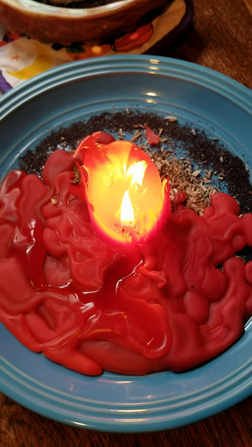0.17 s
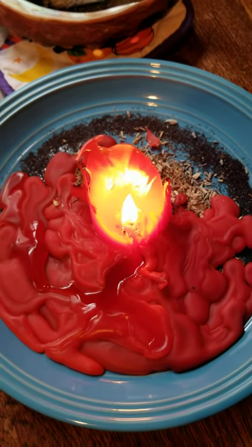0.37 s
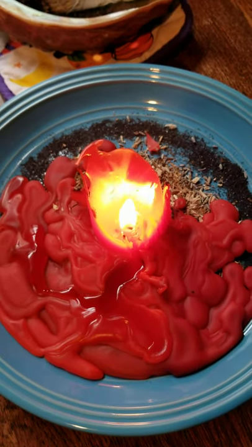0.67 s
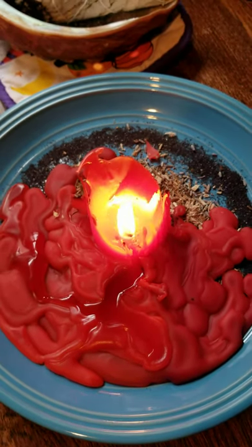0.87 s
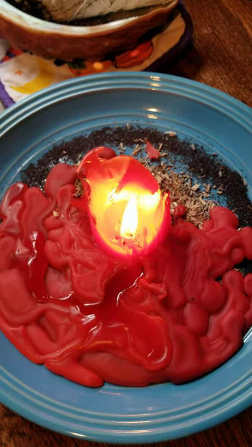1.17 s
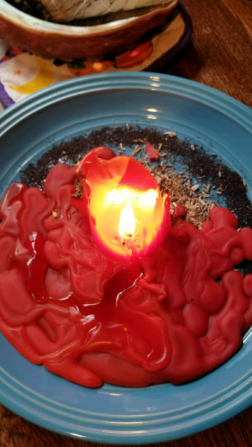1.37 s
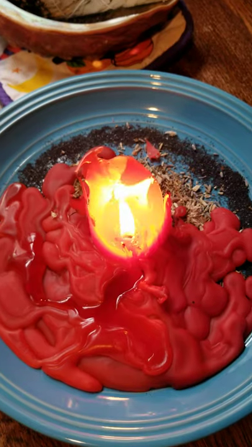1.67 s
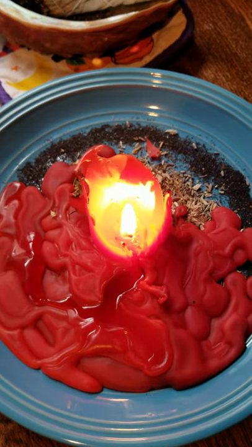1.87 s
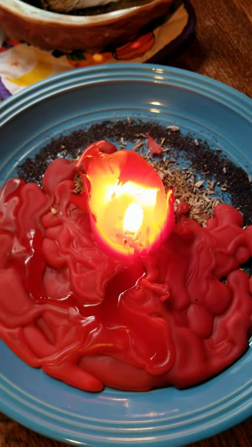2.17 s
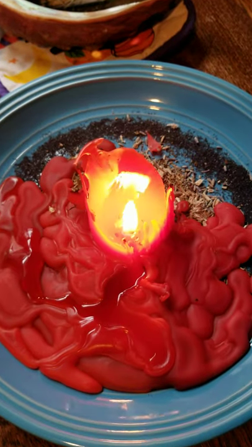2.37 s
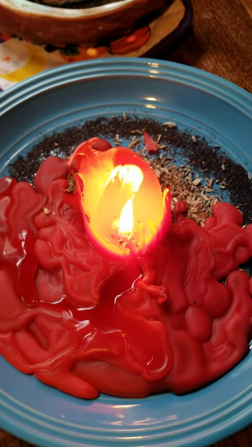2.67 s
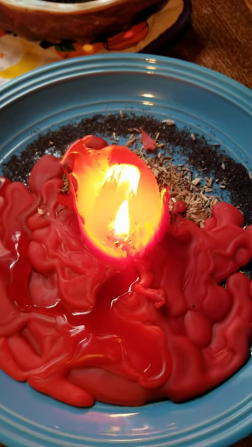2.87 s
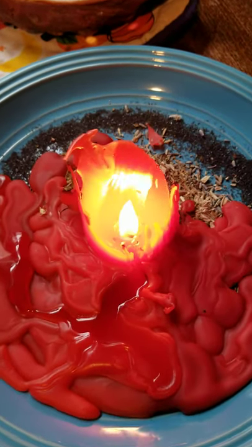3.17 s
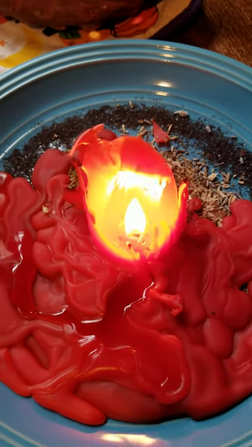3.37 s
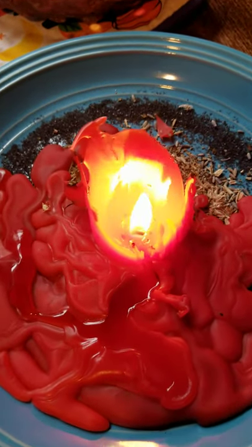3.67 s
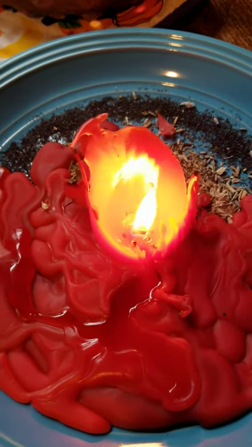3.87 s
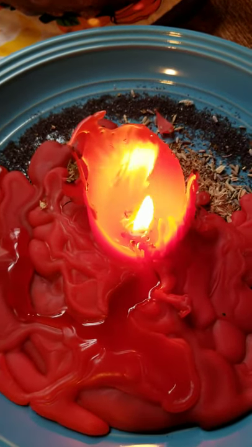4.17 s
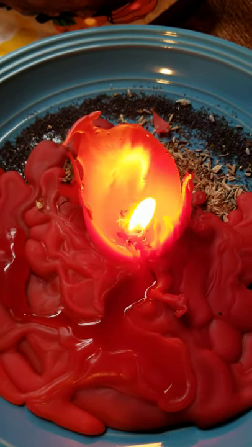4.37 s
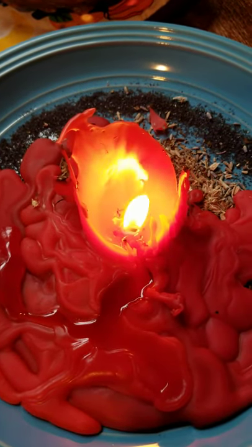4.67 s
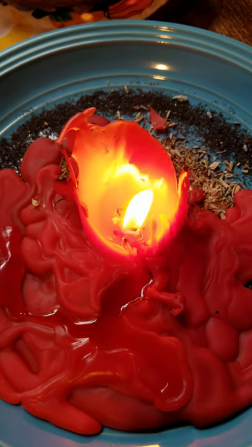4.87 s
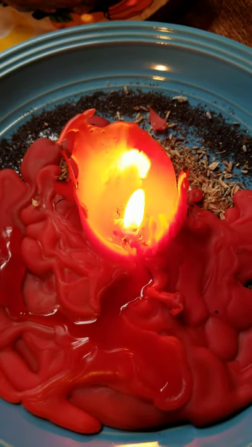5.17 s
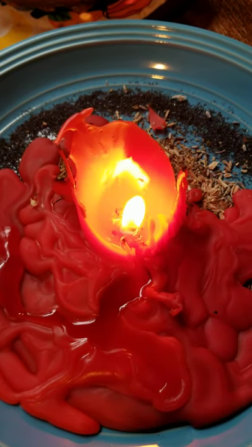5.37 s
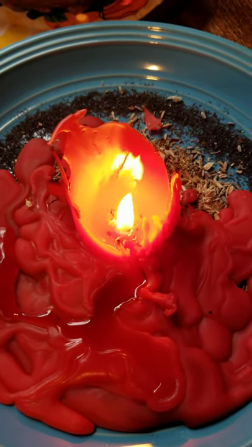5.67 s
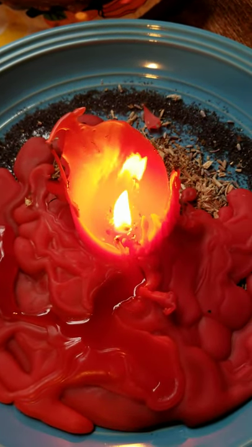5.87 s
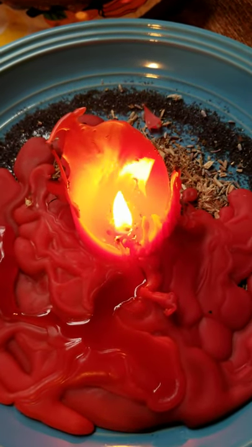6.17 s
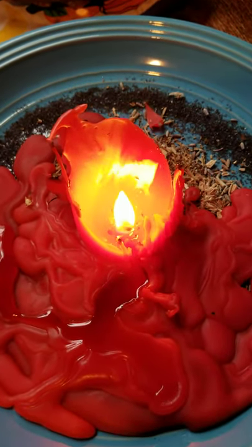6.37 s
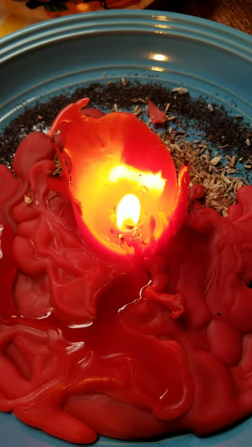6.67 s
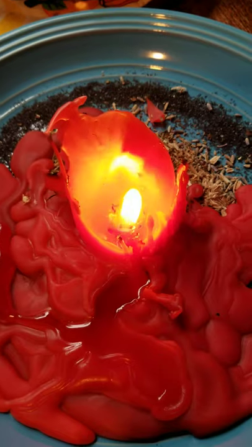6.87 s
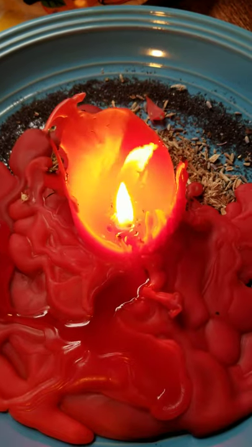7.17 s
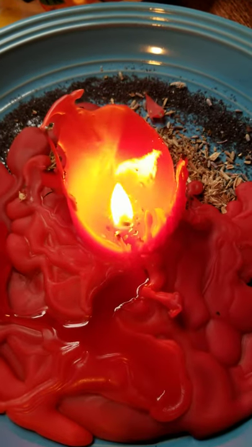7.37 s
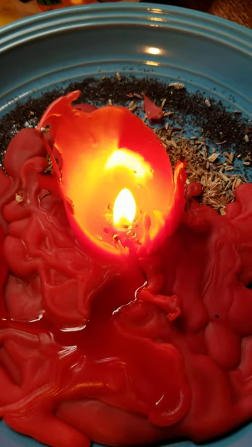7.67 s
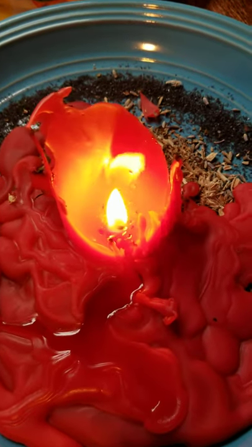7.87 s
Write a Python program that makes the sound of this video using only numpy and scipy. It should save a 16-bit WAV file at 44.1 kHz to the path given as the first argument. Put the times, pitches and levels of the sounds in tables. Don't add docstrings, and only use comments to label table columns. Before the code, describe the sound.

A candle stub burns in melted wax on a plate, heard very close in stereo in a small quiet room. Faint low hum and hiss come first, then isolated bright snaps with long gaps. Near the middle a rapid volley of loud pops opens a dense, fluttering sizzle full of spits. It dies into a crackling lull, then a softer second sizzle rises and continues to the end.

```python
import sys
import numpy as np
from scipy import signal
from scipy.fft import rfft, irfft, next_fast_len
from scipy.io import wavfile
from scipy.ndimage import map_coordinates

SR = 44100
rng = np.random.default_rng(int(sys.argv[2]) if len(sys.argv) > 2 else 0)


def elevation(decibels):
    levels = np.asarray(decibels, float)
    return 10 ** (levels / 20)


def waveform_to_disk(signal):
    frames = np.transpose(np.atleast_2d(signal))
    scaled = np.clip(frames, -1, 1) * 32767
    samples = np.round(scaled).astype(np.int16)
    wavfile.write(sys.argv[1], SR, samples)


N = 353241


def unit(x):
    return x / np.sqrt(np.mean(x ** 2, axis=-1, keepdims=True) + 1e-20)


def along(points, hz):
    point_hz, value = np.transpose(points)
    return np.interp(np.log(hz + 1), np.log(point_hz + 1), value)


def curves(rows, silent=None):
    s, *columns = np.transpose(rows)
    return [np.interp(np.arange(N) / SR, s, column, left=silent) for column in columns]


def wobble(rate):
    knots = rng.standard_normal(int(N * rate / SR) + 4)
    return map_coordinates(knots, [np.arange(N) * rate / SR])


def filtered(x, response):
    m = 2 * next_fast_len(N // 2 + SR // 4)
    return irfft(rfft(x, m) * response(np.fft.rfftfreq(m, 1 / SR)), m)[..., :N]


def causal(points):
    def response(hz):
        cepstrum = irfft(np.log(elevation(along(points, hz))))
        cepstrum[1:len(hz) - 1] *= 2
        cepstrum[len(hz):] = 0
        return np.exp(rfft(cepstrum))
    return response


def band(x, lo_hz, hi_hz):
    return signal.sosfilt(signal.butter(2, [lo_hz, hi_hz], "band", fs=SR, output="sos"), x)


# (time [s], peak level [dB], flame puff re peak [dB], cup ring re peak [dB])
LONE_POPS = [(0.7622, -39, -30, -2), (0.7645, -33.5, -20, -12), (0.7713, -20.5, -33, -1.5),
             (0.7729, -27, -41, -20), (0.7911, -26.5, -33, -10), (0.891, -40, -36, -21),
             (0.9151, -28, -54, -10.5), (0.935, -38, -46, -8), (0.992, -45, -26, 1.5),
             (1.0084, -39, -25, -3), (1.0132, -35, -36, -4), (1.039, -20.5, -44, -13.5),
             (1.2413, -26, -35, -10), (1.4612, -37.5, -29, -8), (1.508, -47, -26, -7),
             (1.5252, -44, -37, -16), (1.5453, -38, -36, -15), (1.5695, -46, -33, -6),
             (1.668, -49, -38, -9), (2.1653, -28.5, -18.5, -5), (2.262, -48, -12, -23),
             (2.32, -48.5, -20, -5), (2.783, -52.5, -15, -2), (3.4885, -33, -24, -9),
             (3.491, -21.5, -29, -25), (3.4939, -20, -28.5, -10), (3.4981, -27, -42, -13),
             (3.6335, -25, -31, -10.5), (3.663, -42, -26, -3.5), (3.719, -45, -23, -9)]
OPENING_VOLLEY = [(3.8127, -17.5, -18, -10.5), (3.8183, -30, -13.5, 2.5), (3.8318, -26, -18, -20),
                  (3.8733, -37, -15, -17), (3.8892, -18, -27, -14), (3.9174, -39, -22, -8),
                  (3.9209, -18, -29, -13), (3.926, -17.5, -31, -12), (3.9268, -14.5, -31, -7),
                  (3.9366, -10, -31.5, -18), (3.952, -12.5, -27, -25), (3.9668, -16.5, -26, -8),
                  (3.9786, -19.5, -18, -14), (4.021, -18.5, -23, -6.5), (4.0435, -44, -23, -7),
                  (4.0536, -18, -26.5, -12), (4.0848, -13.5, -27, -10)]


def pops(spray_db, spray_s, echo_db):
    t = np.arange(512) / SR
    snap, ring, puff = np.zeros((3, N + len(t)))
    for s, db, puff_db, ring_db in np.vstack([LONE_POPS, OPENING_VOLLEY, spits()]):
        spray = elevation(spray_db + rng.normal(0, 1.36) - 60 * t / spray_s)
        burst = spray * rng.standard_normal(len(t))
        burst[0] = 1
        echo_at = rng.integers(50, 75)
        burst[echo_at] += elevation(echo_db + rng.normal(0, 3)) * rng.choice([-1, 1])
        start = round(s * SR)
        at = slice(start, start + len(t))
        snap[at] += elevation(db + 21.0) * burst
        ring[at] += elevation(db + ring_db + 27.5) * burst
        puff[at] += elevation(db + puff_db + 46) * burst
    return band(snap[:N], 3380, 19845) + band(ring[:N], 2015, 4380) + band(puff[:N], 202, 770)


# (time [s], level [dB])
BOIL_LEVEL = [(4.075, -76), (4.1, -38), (4.36, -41), (4.4, -42), (4.8, -43.5), (4.85, -39.5), (4.97, -38),
              (5.08, -44), (5.16, -39.5), (5.295, -40), (5.325, -58.5), (5.52, -42.5), (5.66, -61.5),
              (6.15, -62.5), (6.95, -48.5), (7.06, -41.5), (7.25, -47), (8.01, -47.5)]
# (time [s], peak level [dB], flame puff re peak [dB])
FIRST_BOIL_SPITS = [(4.128, -23, -32), (4.1642, -23, -29), (4.18, -17.5, -28.5), (4.2289, -20, -34),
                    (4.2759, -23, -33), (4.3514, -14.5, -46), (4.3919, -24.5, -37), (4.489, -20.5, -21),
                    (4.5607, -21, -29), (4.6094, -22.5, -25), (4.7132, -21, -23), (4.7499, -19, -24.5),
                    (4.7855, -26.5, -23), (4.8307, -19, -25), (4.9474, -19.5, -18.5),
                    (5.1202, -18.5, -26.5), (5.1536, -18.5, -20), (5.1862, -24, -34), (5.233, -18.5, -31),
                    (5.2934, -19.5, -27), (5.3374, -23, -33.5), (5.419, -22, -20.5), (5.462, -21, -19),
                    (5.4821, -20, -25), (5.5171, -23, -21.5), (5.57, -24, -20), (5.6267, -29.5, -24),
                    (5.7087, -34, -39), (5.7182, -36, -39), (5.735, -29.5, -46)]
LULL_SPITS = [(5.9298, -34, -35), (5.9356, -26.5, -37), (5.9433, -26, -27), (6.104, -24, -34.5),
              (6.124, -50, -32), (6.1548, -30.5, -34), (6.1602, -23, -42), (6.1824, -21.5, -27),
              (6.2113, -37, -28), (6.2248, -30.5, -30), (6.2838, -36, -28), (6.2999, -32.5, -32),
              (6.325, -40.5, -32), (6.402, -34.5, -18), (6.4149, -29, -18.5), (6.4717, -32.5, -25),
              (6.4867, -37, -35), (6.5236, -30, -29), (6.546, -31, -32), (6.5652, -30.5, -29),
              (6.5987, -26.5, -28), (6.6123, -31, -34), (6.6189, -28.5, -36), (6.629, -32.5, -18.5),
              (6.6496, -26.5, -30), (6.6818, -24, -33), (6.7084, -27, -28), (6.7176, -19.5, -32),
              (6.7753, -27, -29)]
SECOND_BOIL_SPITS = [(6.8288, -21, -24), (6.9106, -24.5, -19.5), (6.9664, -27.5, -21), (7.0267, -26.5, -20),
                     (7.0452, -25, -15.5), (7.0738, -24, -20.5), (7.0953, -28, -28), (7.1204, -21, -21),
                     (7.1879, -23, -17.5), (7.1956, -29, -16), (7.259, -30, -14.5), (7.323, -25.5, -24),
                     (7.3297, -22.5, -20), (7.4082, -25, -18.5), (7.4113, -25, -20.5), (7.5003, -33, -12.5),
                     (7.5499, -27, -22), (7.6137, -30.5, -19.5), (7.6495, -26, -22), (7.6803, -29, -19),
                     (7.7245, -32.5, -15), (7.7672, -27, -20.5), (7.8085, -30, -27), (7.8286, -31, -24),
                     (7.864, -27.5, -26), (7.9504, -18.5, -26), (7.9608, -24, -22.5)]


def spits():
    late_s, brood_s, brood_db = .0013, .008, -7.5
    stray_per_s, stray_db, stray_puff_db = 30, 13.5, -26
    ring_db, ring_spread_db = -13, 6.5
    s, db, puff_db = np.vstack([FIRST_BOIL_SPITS, LULL_SPITS, SECOND_BOIL_SPITS]).T
    s = s + late_s
    luck = rng.random((len(s), 4))
    broods = []
    for k in range(2):
        brood_at = s + brood_s * (2 * luck[:, k] - .5)
        broods.append((brood_at, db + brood_db * (.5 + luck[:, k + 2]), puff_db))
    luck = rng.random((400, 3))
    at = luck[:, 0] * (N / SR - .02)
    level = np.interp(at, *np.transpose(BOIL_LEVEL), left=-120) + stray_db - 9 * luck[:, 1]
    happens = luck[:, 2] < stray_per_s * N / SR / 400
    strays = np.array([at, level, np.full(400, stray_puff_db)])[:, happens]
    rows = np.hstack([(s, db, puff_db), *broods, strays])
    ring = ring_db + ring_spread_db * rng.standard_normal(rows.shape[1])
    return np.vstack([rows, ring]).T


def sizzle(rate, spread_db, steam_db):
    boil_db, = curves(BOIL_LEVEL, silent=-120)
    flutter_db = -48.5 + 1.35 * (boil_db + 40.5)
    clump_db = .8 * wobble(40) + 2.4 * wobble(130) + 2.6 * wobble(450)
    size_db = spread_db * np.minimum(rng.exponential(size=N), 3.5)
    ticks = (rng.random(N) < rate / SR) * elevation(size_db) * rng.choice([-1, 1], N)
    steam = elevation(steam_db) * rng.standard_normal(N)
    fizz = unit(elevation(clump_db) * (unit(ticks) + steam))
    gusts = elevation(clump_db + 2.0 * wobble(11)) * rng.standard_normal(N)
    flutter = unit(band(gusts, 88, 1160))
    return elevation(boil_db + 11.5) * band(fizz, 1790, 19845) + elevation(flutter_db + 10.5) * flutter


# (frequency [Hz], gain [dB])
LEFT_PATH = [(170, -9), (650, -14), (1550, -9), (1900, -18), (2400, -5), (2750, 0), (3300, -6), (3850, -13),
             (4300, -7), (5000, -8), (6700, -13), (7500, -10), (11000, -14), (15500, -11)]
RIGHT_PATH = [(170, -10), (1200, -16), (1750, -4), (2400, -4.5), (2750, -1), (3450, -7.5), (4200, -8),
              (5100, -18), (5900, -12), (7200, -17), (9300, -15), (11400, -7), (13000, -6), (15500, -12)]
# (frequency [Hz], phase lead [rad])
LEFT_LEAD = [(170, 0), (860, 1), (1400, .7), (1720, -.4), (1950, 2.2), (2450, 3.14), (2720, 3.14),
             (2920, 2), (3100, 3.14), (3700, 3.25), (4050, 5.4), (4650, 5.7), (5000, 4.2), (9000, 10.5),
             (16000, 18)]
# (time [s], left minus right in the treble [dB], lead change [samples])
PORT_AIM = [
    (1.3, 6.5, -2.3),
    (2.2, 10, -2),
    (3.5, 7, -1.2),
    (4.2, .5, 0),
    (5.3, .5, 0),
    (6.8, 4.5, 0),
]


def ports(wick, wander):
    rim_s, rim_db = .000968, -9
    ring_turn = -1.4
    sheen_gain, sheen_from_db = 1.5, 4
    point_hz = sorted(hz for hz, _ in [*LEFT_PATH, *RIGHT_PATH])
    shared = [(hz, (along(LEFT_PATH, hz) + along(RIGHT_PATH, hz)) / 2) for hz in point_hz]

    def half(hz):
        gain = elevation((along(LEFT_PATH, hz) - along(RIGHT_PATH, hz)) / 2)
        return gain * np.exp(.5j * along(LEFT_LEAD, hz))

    def rim(hz):
        echo = elevation(rim_db) * np.exp(-2j * np.pi * hz * rim_s)
        return 1 + echo / (1 + (7000 / (hz + 1)) ** 4)

    pair = filtered(wick, lambda hz: causal(shared)(hz) * [half(hz), rim(hz) / half(hz)])

    def above(edge_hz):
        return filtered(pair, lambda hz: 1 / (1 + (edge_hz / (hz + 1)) ** 4))

    upper, treble, sheen = above(2200), above(4700), above(10000)
    treble_db, lead = curves(PORT_AIM)
    ring_db = ring_turn * lead
    sheen_db = sheen_gain * np.maximum(treble_db - sheen_from_db, 0)
    sides = np.array([[.5], [-.5]])
    faced_ring = (upper - treble) * elevation(sides * ring_db)
    faced_treble = (treble + sheen * (elevation(sheen_db) - 1)) * elevation(sides * treble_db)
    shift = np.arange(N) + sides * (lead + wander * wobble(200))
    moved = [map_coordinates(port, [at]) for port, at in zip(faced_ring + faced_treble, shift)]
    return pair - upper + moved


# (frequency [Hz], gain [dB])
DIFFUSE_FIELD = [(200, -11.5), (1000, -12.5), (1800, -3), (3500, -7.5), (5500, -14.5), (9000, -9.5),
                 (12500, -5.5), (16000, -26)]
# (frequency [Hz], t60 [s])
ROOM_DECAY = [(300, 0.14), (2500, 0.29), (6000, 0.23), (14000, 0.036)]


def room(wick, scatter_db, scatter_s, tail_db):
    wick = filtered(wick, causal(DIFFUSE_FIELD))[None]
    out = np.zeros((2, N))
    turn = np.array([wobble(12) for _ in range(3)])

    def energy(v):
        return v / np.linalg.norm(v, axis=1, keepdims=True)

    for share in turn / np.linalg.norm(turn, axis=0):
        hz, t, z = signal.stft(rng.standard_normal((2, SR // 2)), SR, nperseg=256)
        decay = elevation(-60 * t / along(ROOM_DECAY, hz)[:, None])
        tail = signal.istft(z * decay, SR, nperseg=256)[1]
        t = np.arange(tail.shape[1]) / SR
        near = rng.standard_normal(tail.shape) * elevation(-60 * t / scatter_s) * (t > .0006)
        scatter = elevation(scatter_db) * band(energy(near), 3600, 19845)
        answer = scatter + elevation(tail_db) * energy(tail * (t > .006))
        out += signal.oaconvolve(wick * share, answer, axes=1)[:, :N]
    return out


# (frequency [Hz], level [dB per Hz])
LEFT_HISS = [(25, -14.5), (60, -1), (120, -3), (200, -16), (500, -28.5), (1200, -31.5), (2000, -19.5),
             (3600, -28), (5500, -39.5), (9300, -39.5), (10800, -29.5), (12500, -25.5), (15700, -31)]
RIGHT_HISS = [(25, -6.5), (60, -8), (120, -5), (200, -17.5), (500, -29), (1200, -30), (2000, -34.5),
              (3600, -39.5), (5500, -45.5), (9300, -47), (10800, -39.5), (12500, -30), (15700, -36)]
# (frequency [Hz], correlation [-1 to 1])
AIR_LIKENESS = [(60, 0.91), (240, 0.52), (950, -0.089), (3770, -0.16), (15000, 0.03)]
# (frequency [Hz], width [Hz], level [dB])
MAINS_HUM = [
    (58.8, 3.86, -65),
    (122.4, 16, -70),
]


def air(level_db):
    def turn(hz):
        return np.arccos(np.clip(along(AIR_LIKENESS, hz), -1, 1)) / 2

    noise = rng.standard_normal((2, N))
    mid, side = filtered(noise, lambda hz: [np.cos(turn(hz)), np.sin(turn(hz))])
    pair = np.array([mid + side, mid - side])
    pair = filtered(pair, lambda hz: elevation([along(LEFT_HISS, hz), along(RIGHT_HISS, hz)]))
    hum = np.zeros(N)
    for hz, width, db in MAINS_HUM:
        hum += elevation(db) * unit(band(rng.standard_normal(N), hz - width / 2, hz + width / 2))
    return elevation(level_db) * pair / np.std(pair) + hum * elevation([[1.2], [-1.2]])


def scene():
    bursts = pops(spray_db=-27, spray_s=.015, echo_db=-12)
    wick = bursts + sizzle(rate=2500, spread_db=4.0, steam_db=-7.5)
    answer = room(wick, scatter_db=-7.5, scatter_s=0.018, tail_db=-13.5)
    return ports(wick, wander=0.5) + answer + air(level_db=-63)


def top_cut(x):
    return signal.sosfilt(signal.butter(12, 17150, fs=SR, output="sos"), x)


def record(dry):
    top_hz, end_hz = 15950, 17100
    hz, t, (mid, side) = signal.stft([dry[0] + dry[1], dry[0] - dry[1]], SR, nperseg=2048)

    def strip(z):
        return np.add.reduceat(abs(z) ** 2, np.arange(0, len(hz), 12))

    power = np.sum(abs(side[hz > 6000]) ** 2, 0)
    attack = power > elevation(2 * 11) * np.roll(power, 1)
    audible = np.repeat(strip(mid) > elevation(2 * -9.5) * strip(side), 12, 0)[:len(hz)]
    hz = hz[:, None]
    mid = mid * (audible | attack | (hz > 4000))
    edge = (hz < top_hz) + elevation(-15) * attack * (hz >= top_hz) * (hz < end_hz)
    hz = hz[:, 0]
    mix = signal.istft(np.array([mid + side, mid - side]) * edge / 2, SR, nperseg=2048)[1][:, :N]
    return top_cut(mix)


dry = scene()
out = record(dry)
waveform_to_disk(out)
```